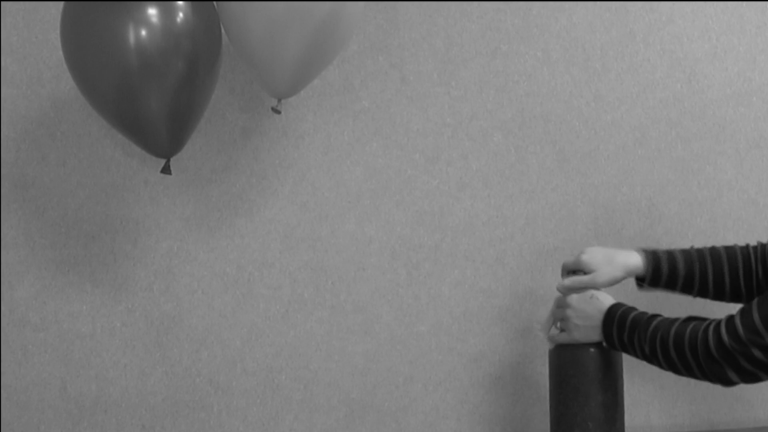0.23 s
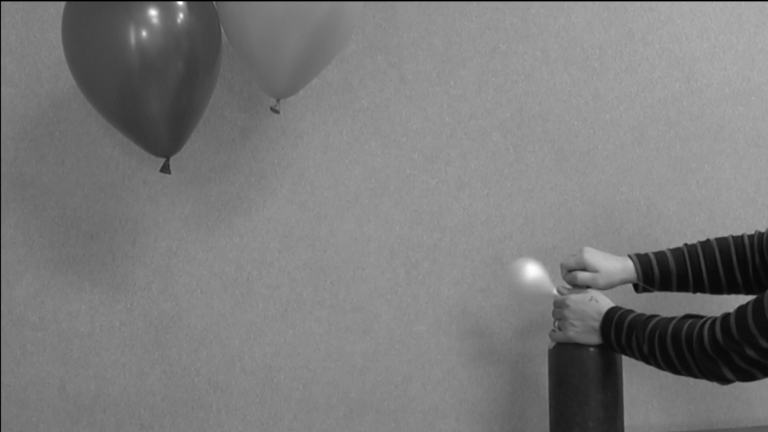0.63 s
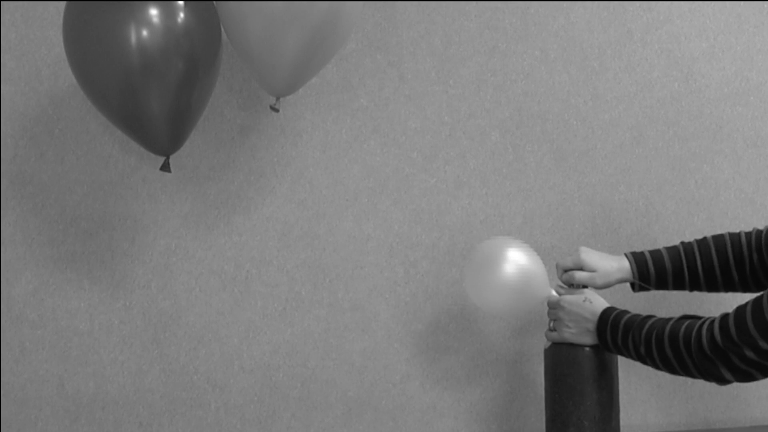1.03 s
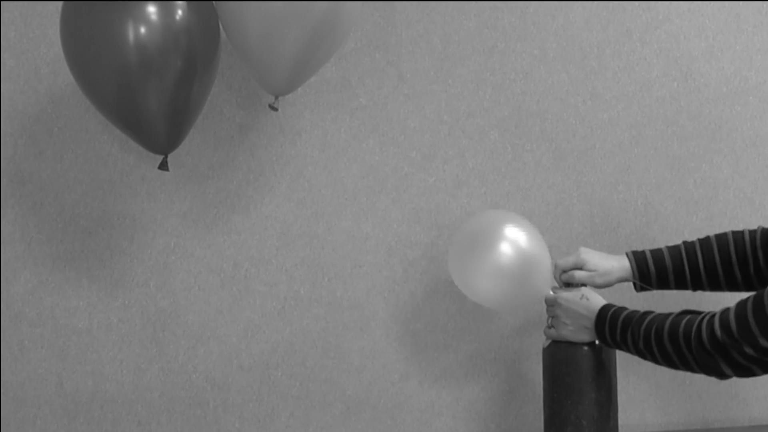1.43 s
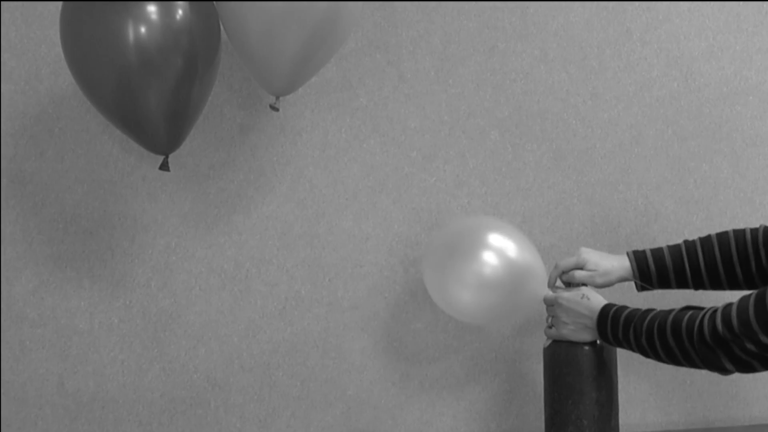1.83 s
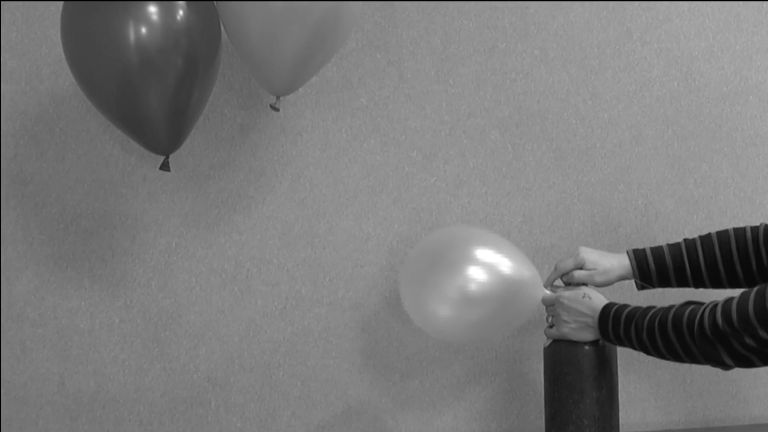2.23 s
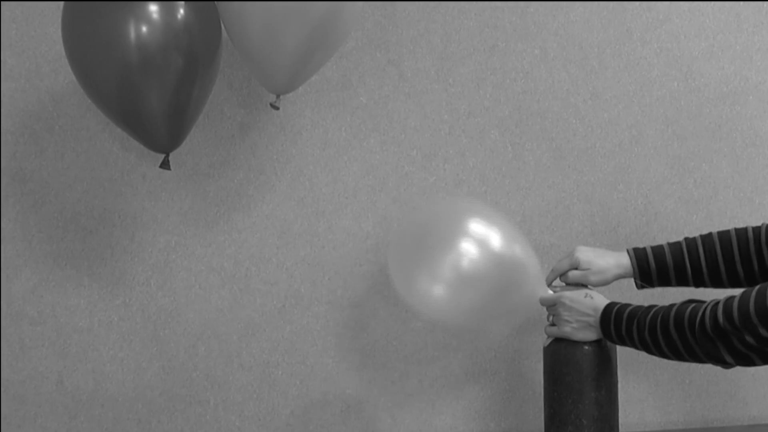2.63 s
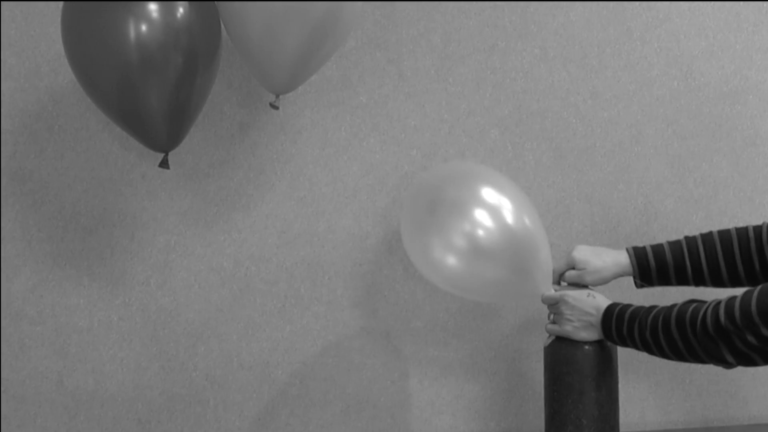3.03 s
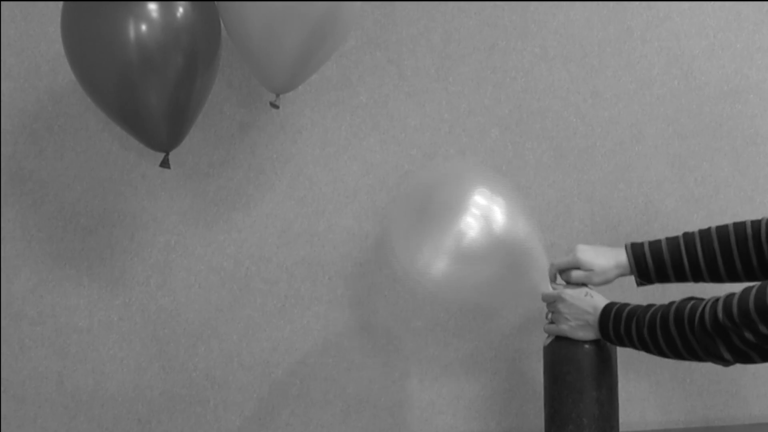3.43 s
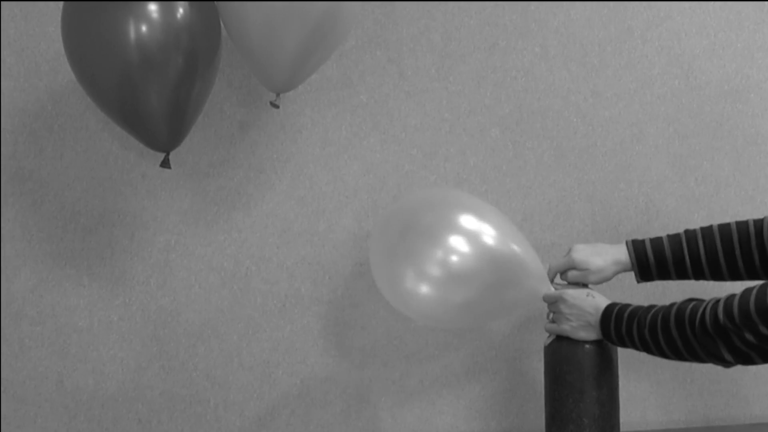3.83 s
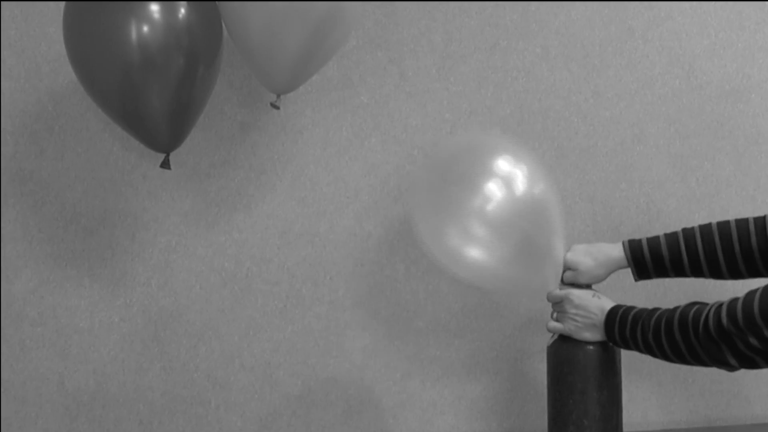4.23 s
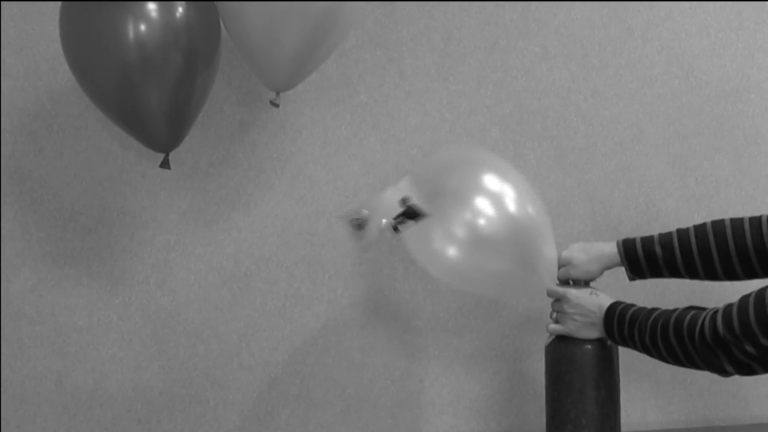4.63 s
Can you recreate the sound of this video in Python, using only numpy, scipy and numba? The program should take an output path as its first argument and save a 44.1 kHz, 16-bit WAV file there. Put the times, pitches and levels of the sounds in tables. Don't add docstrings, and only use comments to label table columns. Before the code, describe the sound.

Soft handling clicks and rubber rustle open over a steady, wavering hum. A valve cracks open and a strong turbulent jet rushes into a balloon, ringing hollow and whistly, gradually lower. After a brief lull comes a second, slightly softer and shorter hiss. Then near quiet, with tiny puffs, a sharp tick and a short squealing leak of air. A distant camera captures it in a small reverberant room, its automatic gain pushing the hum down during the hiss.

```python
import sys
import numpy as np
from scipy import signal
from scipy.fft import rfft, irfft
from scipy.io import wavfile
from scipy.ndimage import uniform_filter1d
from numba import njit

SR = 44100
rng = np.random.default_rng(int(sys.argv[2]) if len(sys.argv) > 2 else 0)


def invert_db(x):
    u = np.asarray(x, float) / 20
    return 10 ** u


def store_wav(level_fs):
    pcm = np.round(np.clip(np.atleast_2d(level_fs), -1, 1) * 32767)
    wavfile.write(sys.argv[1], SR, pcm.T.astype(np.int16))


N = 215957
TIME = np.arange(N) / SR


def level(x, db):
    return x * invert_db(db) / np.sqrt(np.mean(x ** 2))


def curve(table):
    seconds, *columns = np.transpose(table)
    return [np.interp(TIME, seconds, column) for column in columns]


def colour(x, points, lo_hz=20., hi_hz=20000.):
    hz = np.arange(N // 2 + 1) * SR / N + 1
    point_hz, point_db = np.transpose(points)
    gain = invert_db(np.interp(np.log(hz), np.log(point_hz), point_db))
    edges = 1 / np.sqrt((1 + (lo_hz / hz) ** 16) * (1 + (hz / hi_hz) ** 16))
    return irfft(rfft(x) * gain * edges, N)


@njit
def resonate(x, hz, width):
    y, band, low = np.empty(len(x)), 0., 0.
    for i in range(len(x)):
        g, damping = np.tan(np.pi * hz[i] / SR), width / hz[i]
        v = (band + g * (x[i] - low)) / (1 + g * (g + damping))
        band, low, y[i] = 2 * v - band, low + 2 * g * v, damping * v
    return y


def steady(hz):
    return np.full(N, 1. * hz)


def walk(rate):
    hold = int(SR / rate)
    steps = np.repeat(rng.standard_normal(N // hold + 1), hold)
    return 1.034 * uniform_filter1d(uniform_filter1d(steps, hold), hold)[:N]


def shape(start, stop, rise, fade):
    return -rise * np.maximum(start - TIME, 0) - fade * np.maximum(TIME - stop, 0)


def bump(x, width):
    return np.exp(-.5 * (x / width) ** 2)


# turns down from in seconds, lets go in seconds, depth in dB.
DUCKS = [
    (.75, 2.86, -13),
    (3.3, 3.86, -4),
]


def duck():
    held = []
    for start, free, depth_db in DUCKS:
        down = np.maximum(-48 * np.maximum(TIME - start, 0), depth_db)
        recovery = 23.5 * np.maximum(TIME - free, 0)
        held.append(np.minimum(down + recovery, 0))
    return np.min(held, axis=0)


# multiple of the turning rate, level in dB.
MOTOR = [(2, -19), (3, -5), (4, -1), (5, -3), (6, -11), (7, -29)]
# centre in Hz, width in Hz, level in dB against the motor.
WHINE = [(2253, 17, -15.5), (694, 35, -17)]
# frequency in Hz, density in dB per Hz.
AIR = [(30, -36), (55, -32), (85, -9.5), (150, -2.5), (360, -8), (490, -18.5), (780, -9.5), (900, -25),
       (1600, -24), (2300, -23), (3800, -25.5), (7000, -36), (15700, -46)]


def room_tone():
    turns = np.cumsum(33 * (1 + 0.0143 * walk(3.0))) / SR
    harmonics = sum(invert_db(db + 1.5 * walk(9)) * np.sin(2 * np.pi * k * turns) for k, db in MOTOR)
    motor = level(harmonics, -1.3) * invert_db(np.array([[-.8], [.8]]))
    whine = 0
    for hz, width, db in WHINE:
        whine = whine + level(resonate(rng.standard_normal(N), steady(hz), 1. * width), db)
    mid = colour(rng.standard_normal(N), AIR)
    side = colour(rng.standard_normal(N), AIR)
    air = level(mid, -0.91) + level(side, -8) * np.array([[1], [-1]])
    motor_db = -48.5
    return invert_db(motor_db + duck()) * (motor + whine + air)


def tail(t60, channels):
    t = np.arange(SR // 2) / SR
    echoes = rng.standard_normal((channels, len(t))) * invert_db(-60 * t / t60) * (t > .002)
    return echoes / np.sqrt(np.sum(echoes[0] ** 2))


def room(near, feed):
    wall_t60_s, wall_db = 0.19, -6
    room_t60_s, treble_t60_s = 0.68, 0.26
    wall = signal.fftconvolve(near, tail(wall_t60_s, channels=1), axes=1)[:, :N]
    treble = colour(feed, [(20, 0), (20000, 0)], lo_hz=7600.)
    far = 0
    for part, t60 in [(feed - treble, room_t60_s), (treble, treble_t60_s)]:
        far = far + signal.fftconvolve(part[None], tail(t60, channels=2), axes=1)[:, :N]
    return near + invert_db(wall_db) * wall + far * invert_db(np.array([[0.6], [-0.6]]))


# start in seconds, peak in dB, centre in Hz,
# width in Hz, t60 in seconds.
TICKS = [(.001, -42, 6360, 900, 0.056), (.054, -32, 5450, 4400, 0.078), (.062, -48.5, 3400, 120, 0.55),
         (.15, -48, 990, 300, 0.18), (.23, -47, 990, 270, 0.51), (.258, -41, 3880, 700, 0.17),
         (.258, -44, 2420, 410, 0.039), (.330, -45, 1150, 370, 0.15), (.332, -39.5, 3520, 2500, 0.082),
         (0.577, -33, 3100, 900, 0.32), (.636, -33, 503, 700, 0.049), (4.26, -46, 67.6, 29, 0.53),
         (4.534, -27.5, 3370, 2600, 0.08)]


def ticks():
    snap_db, snap_t60_s = 0, 0.0067
    out = 0
    for start, db, hz, width, t60 in TICKS:
        ring = invert_db(shape(start, start, 0, 60 / t60))
        snap = invert_db(snap_db + shape(start, start, 0, 60 / snap_t60_s))
        burst = rng.standard_normal(N) * (TIME >= start) * (ring + snap)
        knock = resonate(burst + 1e-18, steady(hz), 1. * width)
        knock = resonate(knock, steady(hz), 0.99 * width)
        out = out + knock * invert_db(db) / np.max(np.abs(knock))
    return out


# frequency in Hz, density in dB per Hz.
RUSTLE_COLOUR = [(1470, -42), (2500, -9), (3170, -9), (3450, -7), (3970, -21), (5030, -8), (15700, -24)]
PUFF_COLOUR = [(1760, -46), (3000, -16), (3720, -15), (4970, -7), (8190, -2), (11500, -9), (15700, -13)]
LEAK_COLOUR = [(1700, -38), (2200, -13), (3300, -15), (4500, -12), (5700, -7.5), (6300, -1), (6800, 0.5),
               (7400, -6), (8600, -13), (10500, -13.5), (12000, -13), (13500, -17), (15700, -22)]
# start in seconds, held until in seconds, level in dB, rise in dB/s, fade in dB/s.
HISSES = [
    (0.0, .005, -53.5, 500, 42),
    (4.108, 4.228, -52, 200, 90),
    (4.342, 4.425, -49.5, 900, 130),
    (4.577, 4.733, -42, 480, 127),
]


def neck():
    colours = [RUSTLE_COLOUR, PUFF_COLOUR, PUFF_COLOUR, LEAK_COLOUR]
    out = 0
    for (start, stop, db, rise, fade), points in zip(HISSES, colours):
        hiss = level(colour(rng.standard_normal(N), points), 0)
        out = out + hiss * invert_db(db + shape(start, stop, rise, fade) + 1.2 * walk(60))
    return out


# start in seconds, opening time in seconds, shut in seconds, flow in dB.
VALVE = [
    (.548, 0.094, 0.81, -6),
    (.748, 0.013, 2.94, 0),
    (2.92, 0.058, 3.33, -14.5),
    (3.315, .04, 3.955, -2.5),
]


def flow(dying, loss, power):
    total = 0
    for start, opening_s, shut, db in VALVE:
        opening = np.clip((TIME - start) / opening_s, 0, 1) ** power
        stream = opening * invert_db(db * (0.5 + loss) + shape(start, shut, 0, dying))
        total = total + stream ** 2
    return np.sqrt(total)


# centre in Hz, width in Hz, ring in dB with a small balloon, with a full one.
NOZZLE = [(288, 9.1, -5, 4.9), (730, 88, 0.5, 3.36), (1760, 510, -5.5, 2.1), (2124, 470, -17, 5),
          (2790, 166, 2, 0.41), (5150, 770, -14, 4.9)]


def nozzle(gas, full):
    out = 0
    for hz, width, small_db, full_db in NOZZLE:
        out = out + invert_db(small_db + full * (full_db - small_db)) * resonate(gas, steady(hz), 1. * width)
    return out


# time in seconds, frequency in Hz, ring in dB.
SKIN = [(.55, 330, -35), (.95, 360, -1.5), (1.25, 463, 17), (1.6, 510, 12), (1.9, 480, -2), (3.2, 380, -1),
        (3.7, 407, 2), (4.5, 420, 5)]


def skin(gas):
    skin_hz, skin_db = curve(SKIN)
    return invert_db(skin_db) * resonate(gas, skin_hz, 130.0)


# time in seconds, third mode in Hz, second mode in Hz, first mode in Hz.
BALL = [(.56, 5030, 3900, 3180), (.635, 7600, 5340, 4160), (.715, 8700, 5870, 4140),
        (.77, 8950, 5980, 4560), (.92, 8230, 5660, 4700), (1.04, 7380, 5480, 4700), (1.2, 6750, 5650, 4110),
        (1.5, 6020, 5620, 4030), (1.72, 5330, 4870, 4040), (2.15, 5150, 4470, 3600),
        (2.55, 4470, 4070, 3340), (3.3, 4420, 3600, 2800), (4.5, 4270, 3400, 2800)]
UPPER_MODES = [0.281, .56, .84, 1.12, 1.38, 1.64, 1.9, 2.16, 2.42, 2.68]
SPACING = [
    0.97,
    .88,
]
# strongest from in seconds, until in seconds, dB there,
# rise in dB/s, fade in dB/s.
RINGS = [
    (.66, 0.9, 13, 37, 18),
    (.74, 0.94, 12, 39, 13),
    (.75, 2.9, 10.5, 76, 15),
    (.8, 1, 14, 75, 8.5),
]


def gas_ball(gas, full):
    third_hz, second_hz, first_hz = curve(BALL)
    slack_db = 0.5 * full * np.clip(20 * np.log10(flow(110, 0, 1) + 1e-9), -12, 0)
    ring_levels = []
    for start, until, db, rise, fade in RINGS:
        ring_levels.append(db + shape(start, until, rise, fade) + slack_db + 1.3 * walk(11))
    first_db, second_db, third_db, upper_db = ring_levels
    out = invert_db(first_db) * resonate(gas, first_hz, 180.0)
    out = out + invert_db(second_db) * resonate(gas, second_hz, 234.0)
    out = out + invert_db(third_db) * resonate(gas, third_hz, 390.0)
    spacing = SPACING[0] + (SPACING[1] - SPACING[0]) * np.clip((TIME - 1.5) / 3.0, 0, 1)
    for step in UPPER_MODES:
        hz = third_hz * (1 + step * spacing) * (1 + .004 * walk(8))
        mode = resonate(gas, np.clip(hz, 100, .42 * SR), 270.)
        out = out + invert_db(upper_db - 2.5 * step + 3.5 * walk(9)) * mode
    return out


# time in seconds, size as a factor, length in seconds.
WOBBLES = [(0.802, -0.91, 0.053), (1.243, 0.06, .05), (2.282, 1.26, 0.13), (2.514, 0.74, 0.013),
           (2.762, 0.0072, 0.015), (3.802, 0.59, 0.15)]
# frequency in Hz, density in dB per Hz.
JET_COLOUR = [(200, -26.5), (300, -24.5), (440, -27.5), (580, -24.5), (730, -20.5), (920, -22.5),
              (1300, -17.5), (2000, -12.5), (2600, -13.5), (3500, -13), (4300, -7), (5100, -4.5),
              (6000, -6), (7200, -11.5), (9200, -19.5), (12000, -17), (15700, -12)]
# low edge in Hz, high edge in Hz.
JET_EDGES_HZ = [
    (3500, 7600),
    (7600, 17000),
    (1150, 3500),
    (230, 1150),
]
# level in dB, drift in dB/s, gain at the whistle in dB,
# gain in a wobble in dB, dying away in dB/s.
JET_BANDS = [(-25, 1.35, 4, -2, 81), (-30.5, -2.1, -1.5, 1.6, 161), (-33, 0.22, -4, 3, 53),
             (-42.5, -3, -3, 1.5, 37)]
WEAK_FLOW_LOSS = [0.041, 0.19, 0.21, 0.12]
OPENING_POWER = [1.9, 3.4, 1.64, 3]
JET_PAN_DB = [0.47, 3.1, 3.2, 3.9]
JET_ROOM_DB = [-28.5, 1.5, -6, -4]


def jet():
    full = np.clip((TIME - 1.3) / 1.24, 0, 1)
    gas = rng.standard_normal(N) * invert_db(0.27 * walk(250))
    ringing = gas + gas_ball(gas, full) + skin(gas) + nozzle(gas, full)

    third_hz = curve(BALL)[0]
    whistle_hz, whistle_octaves = 5650, 0.12
    whistle = bump(np.log2(third_hz / whistle_hz), whistle_octaves) * (TIME > VALVE[1][0])
    wobble = sum(size * bump(TIME - s, length) for s, size, length in WOBBLES)
    surge_db = 0.56 * walk(14) + 0.12 * walk(39.7)
    drift_s = np.clip(TIME - 1, 0, 1.857)
    skin_db = curve(SKIN)[1]

    direct = feed = 0
    bands = zip(JET_EDGES_HZ, JET_BANDS, WEAK_FLOW_LOSS, OPENING_POWER, JET_PAN_DB, JET_ROOM_DB)
    for edge, row, loss, power, pan_db, room_db in bands:
        db, drift, whistle_db, wobble_db, dying = row
        band = colour(ringing, JET_COLOUR, *edge)
        heard_db = db + drift * drift_s + whistle_db * whistle + wobble_db * wobble
        heard_db = heard_db + surge_db + 0.5 * walk(23.92)
        band = band / np.sqrt(uniform_filter1d(band ** 2, size=SR // 4))
        band = band * invert_db(heard_db) * flow(dying, loss, power)
        if edge == JET_EDGES_HZ[-1]:
            band = band * invert_db(0.092 * skin_db)
        direct = direct + band * invert_db(np.array([[pan_db], [-pan_db]]) / 2)
        feed = feed + band * invert_db(room_db)
    return direct, feed


def scene():
    direct, feed = jet()
    hands = neck() + ticks()
    return invert_db(-1.5) * room(direct + hands, feed + invert_db(-6) * hands) + room_tone()


def top_cut(x):
    return signal.sosfilt(signal.butter(12, 15740, fs=SR, output="sos"), x)


def record(dry):
    mix = np.tanh(1.6 * dry) / 1.6
    return top_cut(mix)


dry = scene()
out = record(dry)
store_wav(out)
```